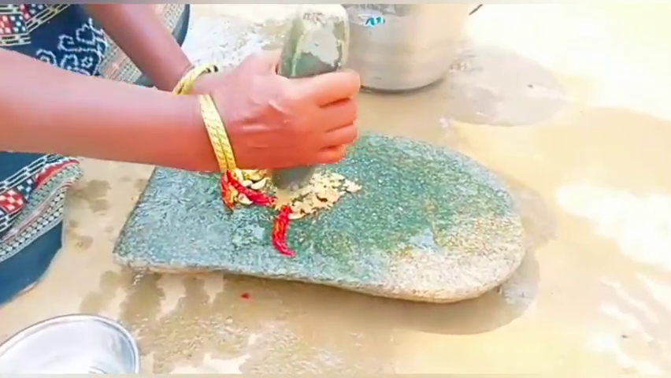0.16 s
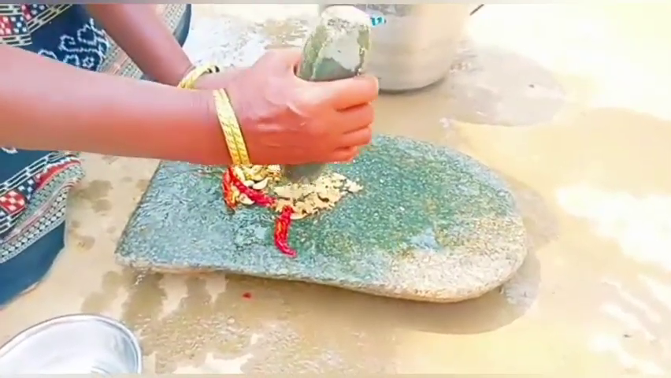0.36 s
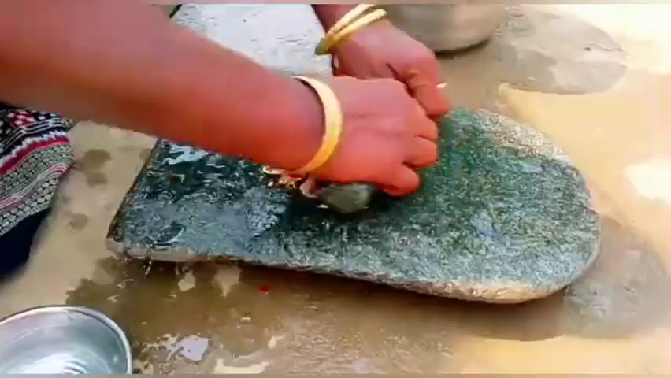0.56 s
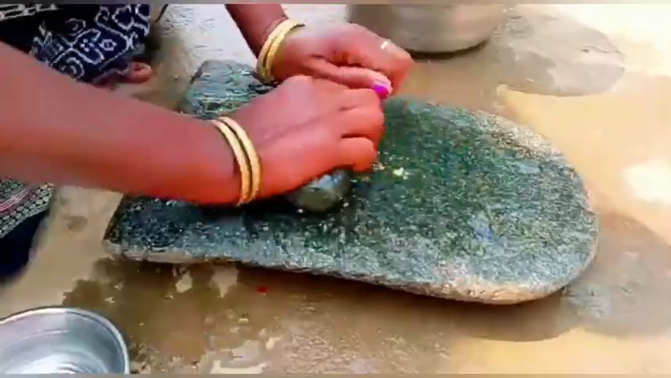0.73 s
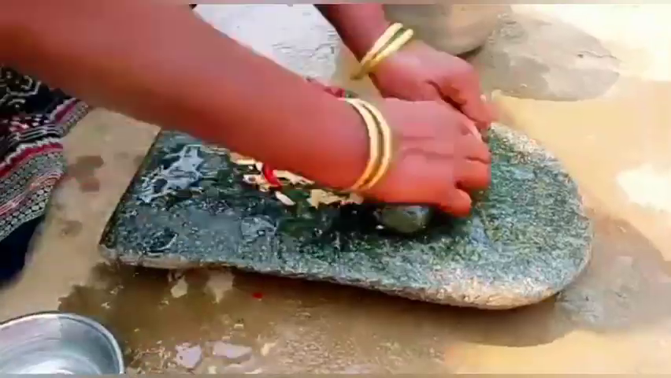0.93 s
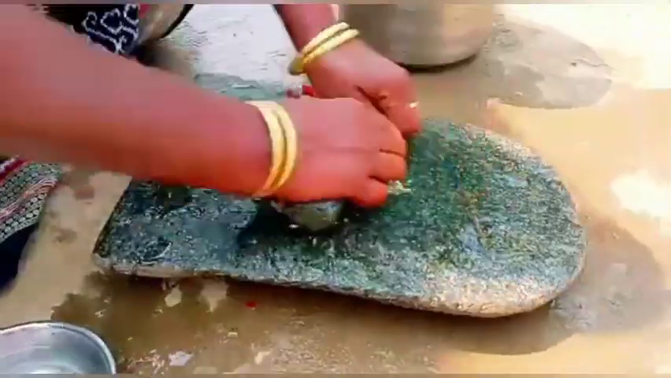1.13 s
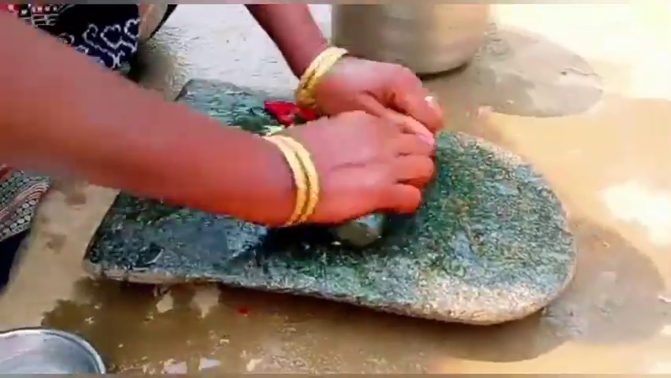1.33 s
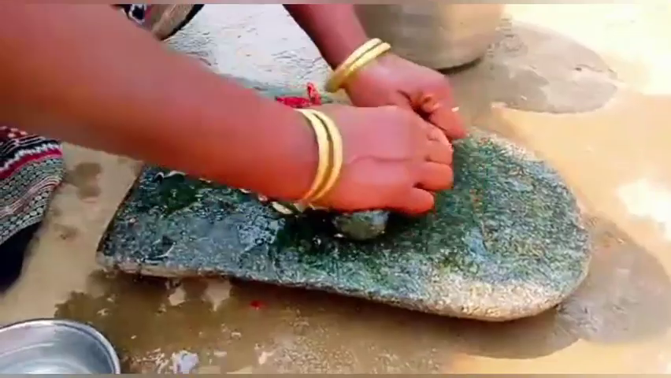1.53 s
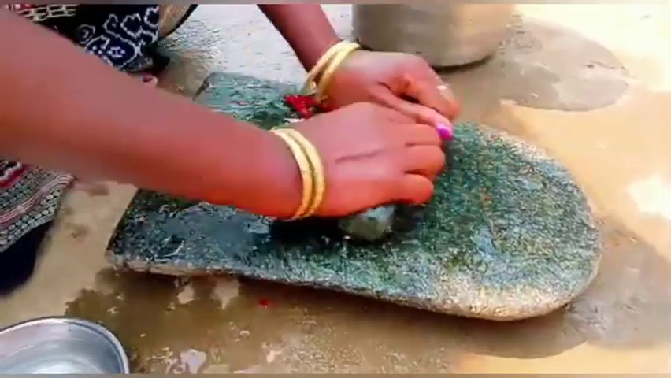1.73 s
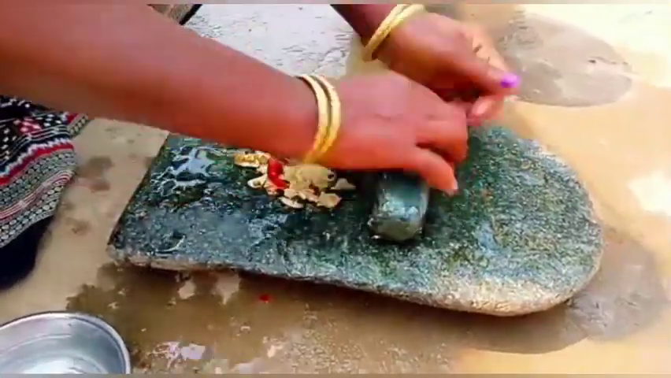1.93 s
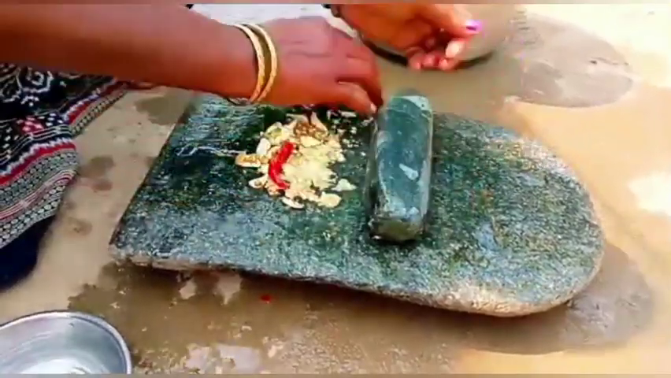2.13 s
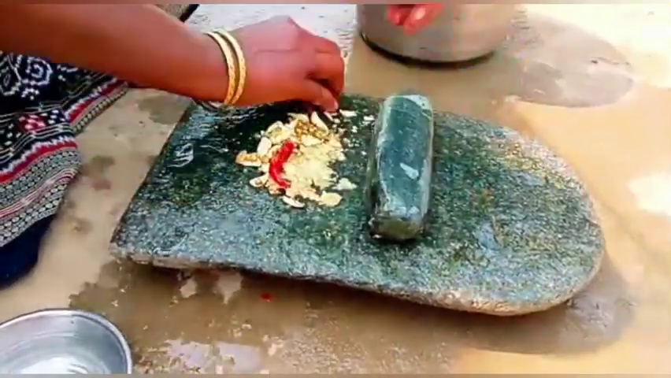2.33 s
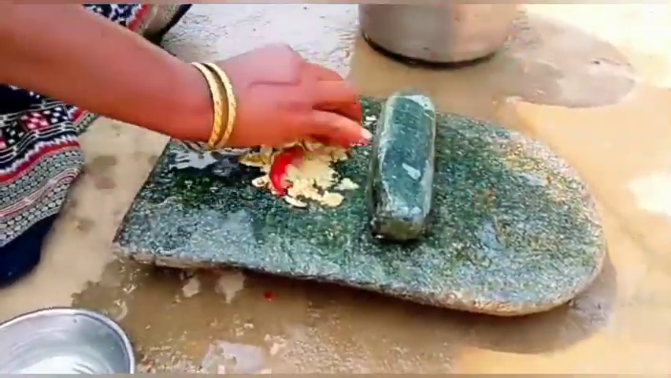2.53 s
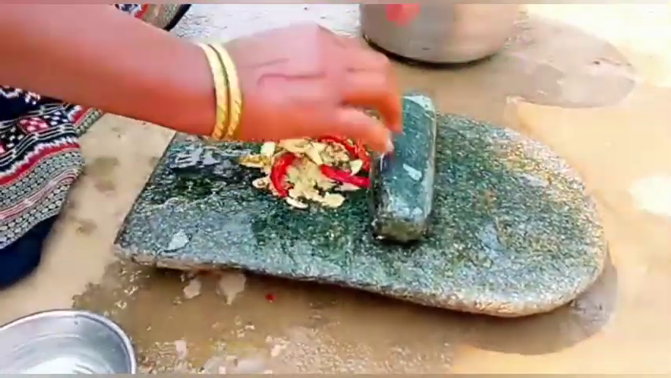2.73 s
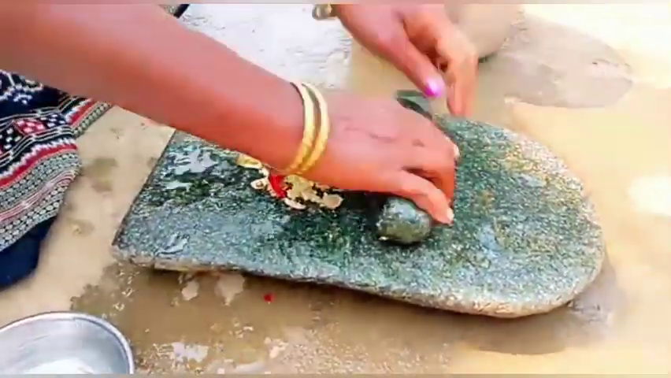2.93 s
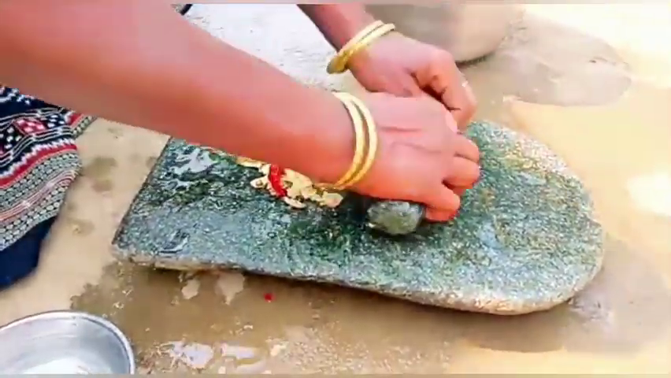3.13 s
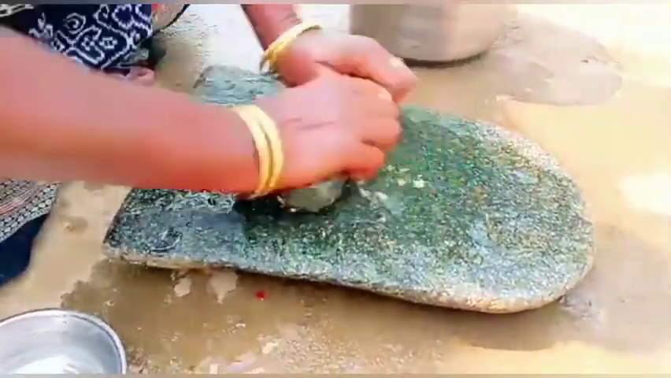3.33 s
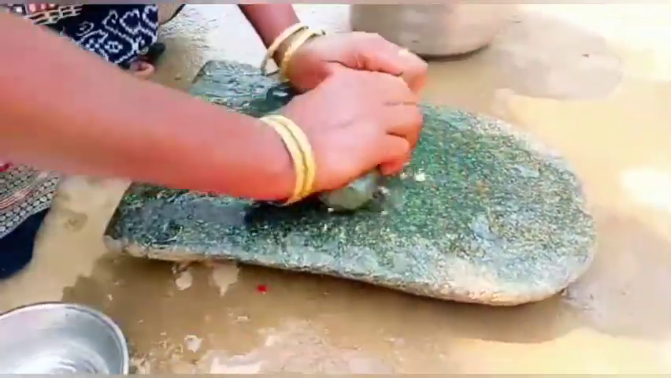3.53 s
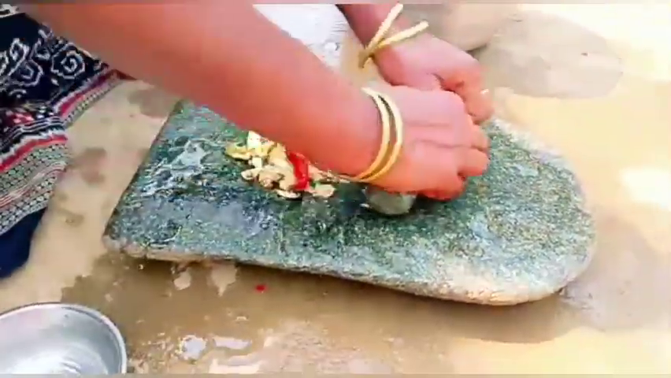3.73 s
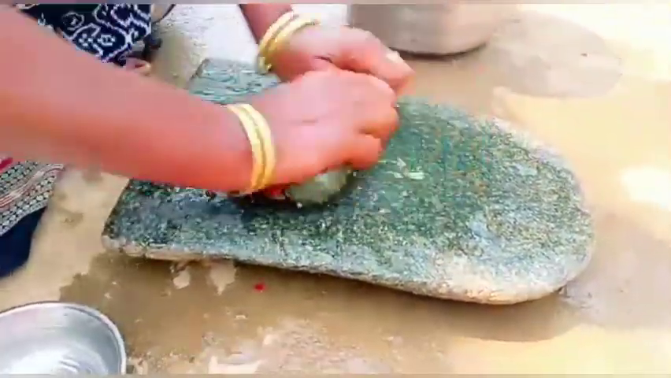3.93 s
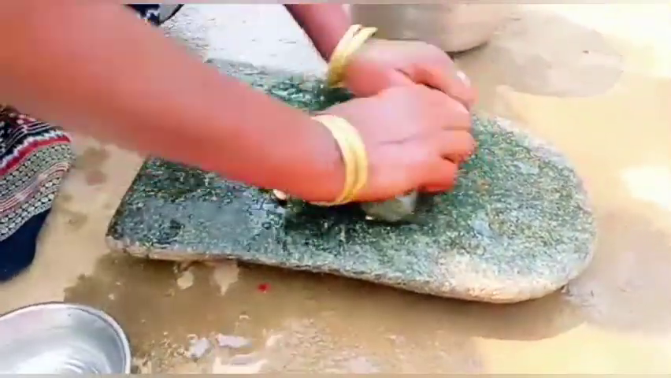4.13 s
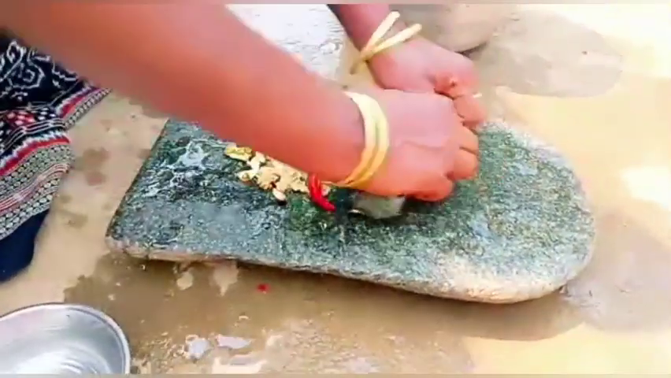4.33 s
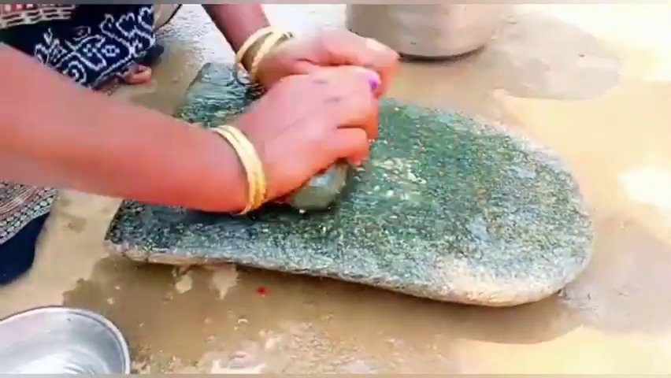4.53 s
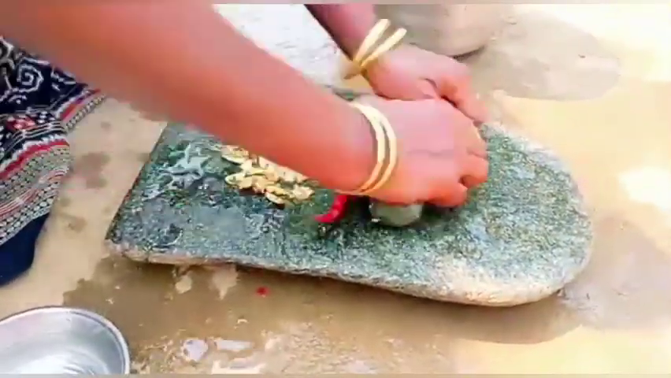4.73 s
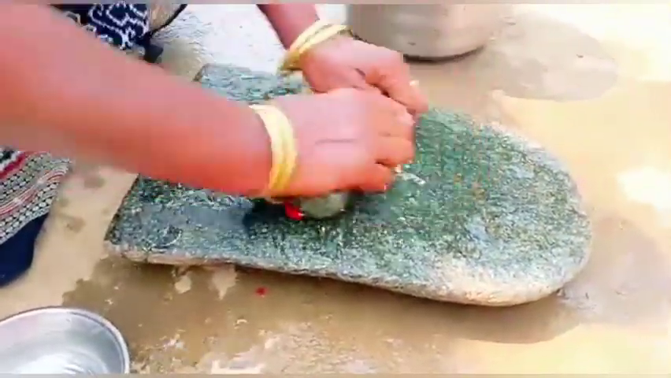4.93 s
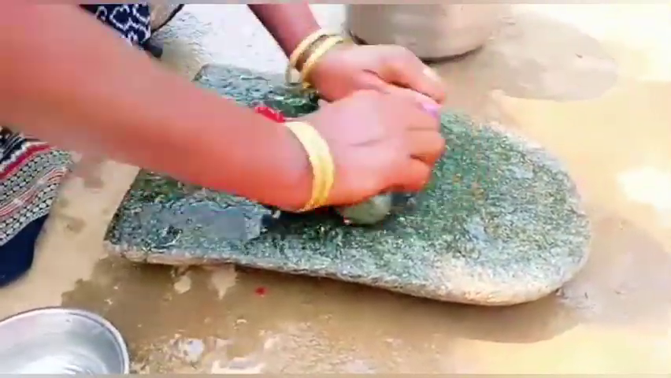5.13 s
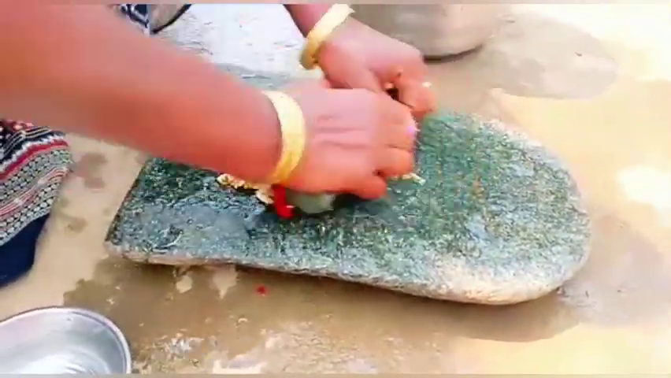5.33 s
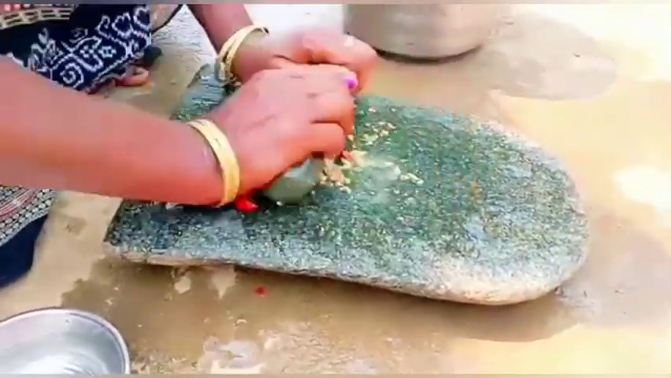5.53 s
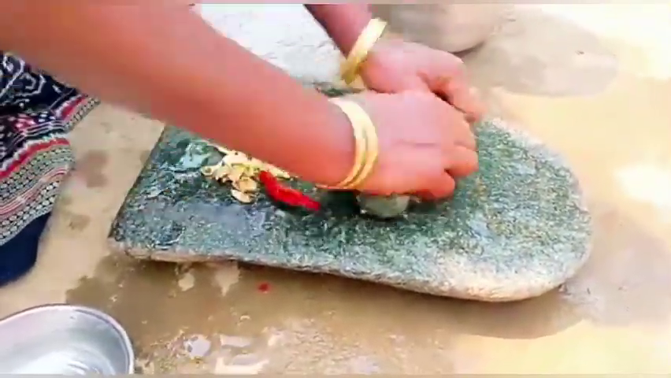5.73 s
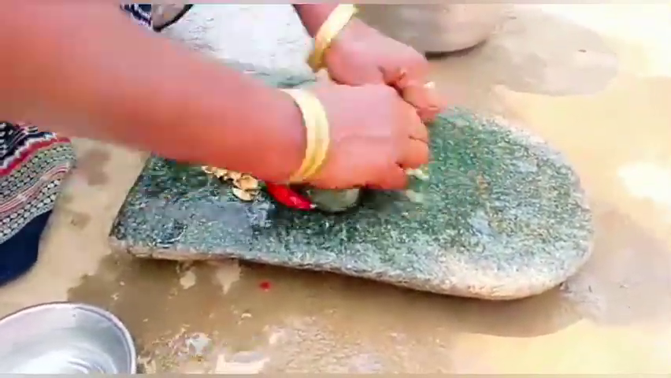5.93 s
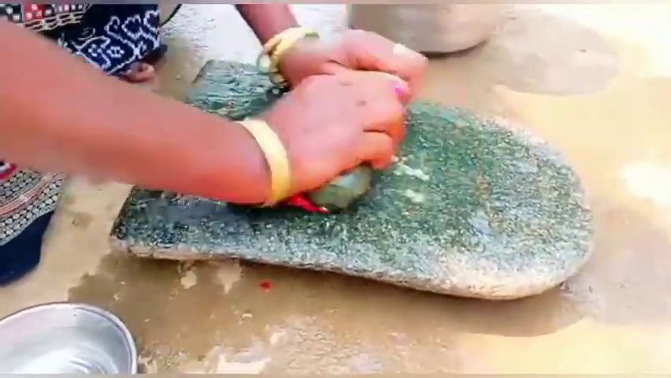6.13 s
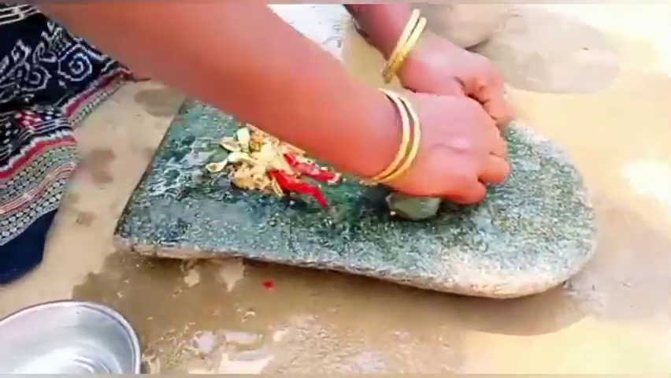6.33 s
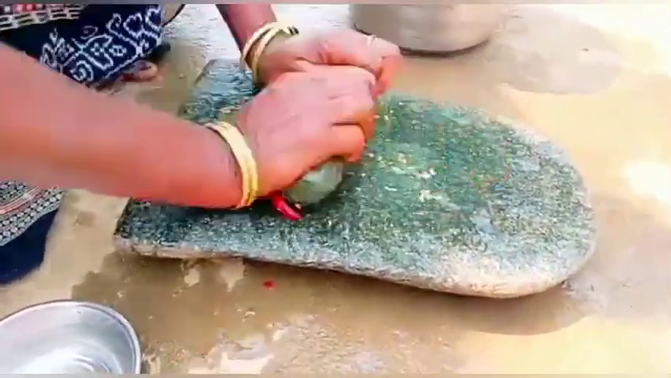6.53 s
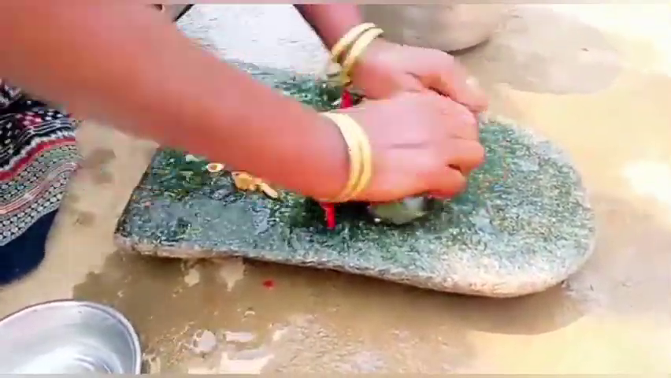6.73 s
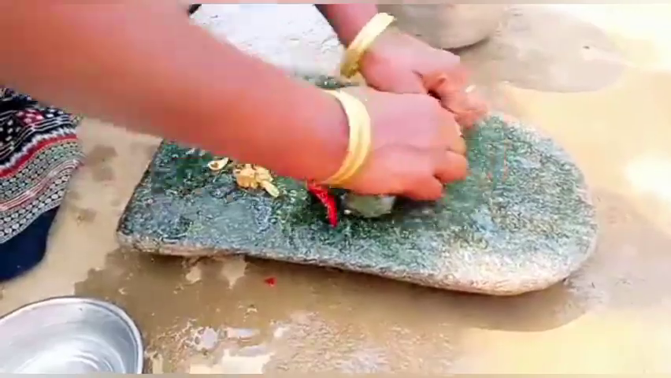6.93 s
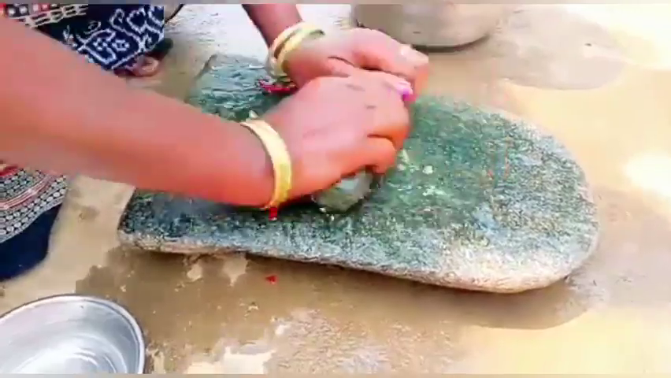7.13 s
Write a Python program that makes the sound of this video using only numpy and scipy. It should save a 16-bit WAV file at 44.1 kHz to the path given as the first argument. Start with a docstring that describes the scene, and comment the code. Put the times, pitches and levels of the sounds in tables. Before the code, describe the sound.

Close to the microphone in a quiet yard, dry chillies and garlic are ground on a flat stone. One thud opens, followed by gentle pushes and pulls and a faint rustle of fingers gathering the heap. Then the grinding resumes more firmly in a steady back-and-forth rhythm, with crisp crunching, gritty scraping, a low rumble and occasional stone clacks. Two bangles clink brightly as the strokes change direction.

```python
"""An open yard, a stereo microphone close to a stone slab: dried chillies and garlic are being ground.
The hand stone pounds once and the sound drops out briefly. A few light pushes and pulls follow, then
fingers rake the spices together. From about 3 s the strokes come harder: husks rasp and snap, stone
judders and knocks on stone, the slab rumbles. At the turns of the stroke two metal bangles slide
together on the wrist and clink."""
import sys
import numpy as np
from scipy import signal
from scipy.fft import rfft, irfft, next_fast_len
from scipy.io import wavfile
from scipy.ndimage import uniform_filter1d, map_coordinates

SR = 44100
rng = np.random.default_rng(int(sys.argv[2]) if len(sys.argv) > 2 else 0)


def store_pcm(level_fs):
    """Save levels as 16-bit WAV."""
    pcm = np.round(np.clip(level_fs, -1, 1) * 32767).astype(np.int16)
    wavfile.write(sys.argv[1], SR, np.atleast_2d(pcm).T)


N = 320597

# modes of the hand stone on the slab: (f/Hz, level/dB, t60/s)
STONE_MODES = [(700, -12, .012), (900, -9, .015), (1000, -12, .04), (1281, -22, .03), (1510, -8, .008),
               (1960, -4, .022), (2090, 2, .012), (2155, -5, .05), (2860, -11, .014), (3180, -17, .02),
               (5050, -18, .015), (5480, -19, .015)]
TOUCH_SPREAD_DB = 2.5   # how much a mode's strength varies from touch to touch


def from_db(db):
    """Decibels to gain."""
    return 10 ** (np.asarray(db) / 20)


def rms_one(x):
    """Scale to rms 1."""
    return x / np.sqrt(np.mean(x ** 2) + 1e-20)


def in_time(rows):
    """Each column of a (t/s, values...) curve at every sample."""
    s, *columns = np.transpose(rows)
    return [np.interp(np.arange(N) / SR, s, c) for c in columns]


def colour(x, spectrum):
    """Shape a sound by (f/Hz, level/dB) points."""
    hz, db = np.transpose(spectrum)
    size = next_fast_len(x.shape[-1] + 2048)
    bins = np.maximum(np.fft.rfftfreq(size, 1 / SR), 1)
    gain = from_db(np.interp(np.log(bins), np.log(hz), db))
    return irfft(rfft(x, size) * gain, size)[..., :x.shape[-1]]


def low_cut(x, hz, order):
    """Shed the bass below hz."""
    return signal.sosfilt(signal.butter(order, hz, "high", fs=SR, output="sos"), x)


def soften(x, hz):
    """A soft contact passes little above hz."""
    return signal.sosfilt(signal.butter(2, np.clip(hz, 20, .45 * SR), fs=SR, output="sos"), x)


def drift(hz):
    """A smooth random wander with spread 1."""
    r = np.exp(-40 * np.pi * hz / SR)
    slow = signal.lfilter([1], [1, -2 * r, r * r], rng.standard_normal(N // 20 + 2002))[2000:]
    return np.interp(np.arange(N) / 20, np.arange(len(slow)), rms_one(slow))


def ring(force, modes, spread_db=0):
    """A force rings (f/Hz, level/dB, t60/s) modes, each with a strength that depends on where it lands."""
    out = 0
    for k, (hz, db, t60) in enumerate(modes):
        r, w = from_db(-60 / (t60 * SR)), 2 * np.pi * hz / SR
        gain = (-1) ** k * from_db(db + spread_db * rng.standard_normal())
        out = out + gain * signal.lfilter([0, np.sin(w)], [1, -2 * r * np.cos(w), r * r], force + 1e-18)
    return out


def grains(per_s, size_db, count=N):
    """Random tiny fractures, a few much larger than the rest."""
    sizes = from_db(size_db * np.minimum(rng.exponential(1, count), 4))
    return (rng.random(count) < per_s / SR) * sizes * rng.choice([-1, 1], count)


def burst(decay_s, per_s, first):
    """Force of one contact: a first touch, then a dying chatter of smaller ones."""
    t = np.arange(SR // 3) / SR
    chatter = grains(per_s, 0.6, count=len(t)) * np.exp(-(t / decay_s) ** 2)
    return chatter / (np.linalg.norm(chatter) + 1e-9) + first * (t == 0)


def add(track, s, db, sound):
    """Place a sound at s with its loudest 3 ms at db."""
    loudest = np.sqrt(uniform_filter1d(sound ** 2, size=132).max()) + 1e-12
    start = round(s * SR)
    track[start:start + len(sound)] += (from_db(db) / loudest * sound)[:N - start]


def shifting(x, depth_db, hold_s, octaves):
    """The gap under the stone keeps changing shape, so its resonances come and go."""
    hz, s, parts = signal.stft(x, SR, nperseg=512)
    chance = rng.standard_normal((200, 1500))
    where = np.meshgrid(np.log2(1 + hz / 100) / octaves, s / hold_s, indexing="ij")
    gain = from_db(depth_db * map_coordinates(chance, where, order=1))
    return rms_one(signal.istft(parts * gain, SR)[1][..., :N])


def hiss(level_db=-69):
    """The background hiss rises a little in the pause between the runs of strokes."""
    spectrum = [(20, 11), (60, 14.5), (110, 2), (300, -2.5), (600, -10), (1300, -15), (2000, -5),
                (3500, -12.5), (5300, -15), (8000, -19), (16000, -21.5)]   # background hiss: (f/Hz, level/dB)
    swell = [(0, 1.5), (.7, -6), (1.9, 6), (2.9, 3.5), (3.6, 3), (7.2, 0.5)]   # its rise and fall: (t/s, level/dB)
    swell_db, = in_time(swell)
    noise = rng.standard_normal((2, N)) + rng.standard_normal(N)
    return from_db(level_db + swell_db) * rms_one(colour(noise, spectrum))


def yard(x, near_t60_s=.035, far_t60_s=.14, far_db=-10):
    """Nearby ground and pots scatter the sound from the sides; farther walls add a faint tail."""
    reflected = [(100, -20), (350, -13), (700, -10), (1500, -6), (5000, -5), (12000, -8)]   # reflections against the direct sound: (f/Hz, level/dB)
    t = np.arange(SR // 2) / SR
    near = rng.standard_normal(len(t)) * from_db(-60 * t / near_t60_s)
    far = rng.standard_normal((2, len(t))) * from_db(-60 * t / far_t60_s)
    scatter = near / np.linalg.norm(near) * [[1], [-1]] + from_db(far_db) * far / np.linalg.norm(far[0])
    scatter = np.pad(colour(scatter, reflected), ((0, 0), (SR // 1000, 0)))   # 1 ms late
    return x + signal.fftconvolve(x, scatter, axes=1)[:, :N]


def letting_go():
    """A faint ring as the hand slides off the stone."""
    modes = [(1160, -8, .04), (1260, -9, .04), (3210, -3, .07), (3400, -8, .04), (3750, -6, .03),
             (4930, 0, .04), (5230, -6, .04)]   # the lightly touched stone: (f/Hz, level/dB, t60/s)
    out = np.zeros(N)
    add(out, s=1.834, db=-49.5, sound=ring(burst(.06, 3000, first=.1), modes))
    return out


def rumble(level_db, gain_db=-1):
    """The stone rides over lumps and shakes the slab."""
    spectrum = [(25, -21), (50, -7.5), (80, 3.5), (130, 6.5), (240, 1.5), (300, -15.5), (390, -35),
                (500, -53), (900, -34.5)]   # the shaking slab: (f/Hz, level/dB)
    shake = colour(rng.standard_normal(N), spectrum)
    return shifting(shake, depth_db=4, hold_s=.093, octaves=.63) * from_db(level_db + gain_db)


def scrape(level_db, gain_db=-3.5):
    """The drag of the stone sounds hollow under the cupped hands."""
    spectrum = [(200, -4), (310, -13), (390, 5.5), (490, -16), (600, 7.5), (720, 2.5), (900, -0.5),
                (1300, -22.5), (2500, -86)]   # the hollow resonances: (f/Hz, level/dB)
    drag = colour(grains(3000, 2), spectrum)
    return shifting(drag, depth_db=4.5, hold_s=.05, octaves=.2) * from_db(level_db + gain_db)


def judder(level_db, slips_per_s=500, ring_db=-1, grit_db=-2):
    """Stone catches and slips on stone: the slips ring its modes over coarse grit."""
    spectrum = [(500, -2), (750, -9.5), (1000, 22.5), (1300, 0.5), (1800, 10.5), (2200, -13.5), (2700, -35),
                (4500, -48)]   # grit between the stones: (f/Hz, level/dB)
    slips = rms_one(ring(grains(slips_per_s, 0.91), STONE_MODES))
    grit = shifting(colour(grains(4000, 2.5), spectrum), depth_db=4.5, hold_s=.035, octaves=.2)
    return (from_db(ring_db) * slips + from_db(grit_db) * grit) * from_db(level_db + 3 * drift(35))


def thuds():
    """Blows cushioned by the spices rock the slab; each has its own bass cut, some deep, some thin."""
    blows = [(0.164, -25.5, 70.5, 247), (0.203, -43.5, 69.3, 182), (2.874, -37, 400, 273),
             (3.171, -45, 90, 350), (6.311, -47, 406, 730)]   # (t/s, level/dB, bass cut f/Hz, contact brightness f/Hz)
    slab_modes = [(84, -10, .13), (125, -2, .05), (185, 0, .04), (264, -6, .09), (360, -8, .06),
                  (570, -18, .05), (870, -6, .03), (1000, -2, .025)]   # the slab on the ground: (f/Hz, level/dB, t60/s)
    out = np.zeros(N)
    for s, db, low_hz, bright_hz in blows:
        force = soften(burst(.0015, 3500, first=1.9), bright_hz)
        add(out, s, db, ring(low_cut(force, low_hz, order=2), slab_modes))
    return out


def knocks(gain_db=-4):
    """The hand stone tips over a lump and lands on bare slab."""
    landings = [(0.166, -29.5, 556), (1.381, -38.5, 2270), (1.467, -30.5, 1750), (3.112, -36.5, 1000),
                (3.137, -41, 1210), (3.147, -31.5, 1220), (3.171, -28.5, 1390), (3.71, -34, 974),
                (3.743, -44, 2140), (4.08, -48, 3130), (5.295, -16, 2520), (5.336, -29.5, 1080),
                (5.412, -41.5, 824), (5.54, -29, 1990), (5.798, -39.5, 910), (5.826, -26.5, 1170),
                (5.849, -28.5, 912)]   # (t/s, relative level/dB, contact brightness f/Hz)
    out = np.zeros(N)
    for s, db, bright_hz in landings:
        force = soften(soften(burst(.004, 2500, first=2), 1.3 * bright_hz), 2600)
        clack = ring(force, STONE_MODES, TOUCH_SPREAD_DB / 2)
        add(out, s, db + gain_db, low_cut(clack, 600, order=4))   # a small stone radiates little bass
    return out


def bangles(high_db=-6, low_db=-18, tick_db=13, clack_db=3, skin_db_per_s=795):
    """Two bangles buzz together, clack and tinkle; their ring beams unevenly to left and right."""
    modes = [(2159, -19, .08), (3990, -19, .07), (4140, -20, .06), (6370, -10, .06), (6570, -10, .05),
             (9200, -17, .06), (9515, -12, .06), (9900, -8, .012), (10970, -16, .04), (11420, -10, .04),
             (12050, -6, .02), (12430, -3, .04), (12650, 2, .012), (12875, -3, .065), (13490, -18, .04),
             (15100, -12, .01)]   # both bangles, in close pairs: (f/Hz, level/dB, t60/s)
    clinks = [(1.175, -39.5, 0.012), (1.379, -42, 0.0093), (1.776, -37.5, .006), (2.119, -36, 0.0084),
              (2.162, -43, 0.011), (3.399, -22.5, 0.0027), (3.416, -33, 0.0055), (3.633, -35, 0.0049),
              (3.647, -24, 0.0033), (3.964, -26, 0.0069), (4.465, -23, 0.014), (4.711, -25.5, 0.02),
              (4.9714, -15, 0.0055), (5.192, -24.5, 0.021), (5.471, -32.5, 0.013), (5.49, -29, 0.043),
              (5.674, -30, 0.034), (5.993, -24.5, 0.022), (6.021, -16.5, 0.0031), (6.204, -29, 0.017),
              (6.234, -29.5, 0.024), (6.506, -21, 0.018), (6.526, -17, 0.0016), (6.736, -28.5, 0.039),
              (7.021, -21.5, 0.032), (7.2323, -29.5, 0.012)]   # they meet at the turns: (t/s, relative level/dB, buzz length/s)
    clacks = [(3.3981, -31), (3.967, -47.5), (4.426, -35), (4.463, -29.5), (4.472, -43), (4.9704, -34.5),
              (5.473, -40), (5.522, -44), (5.995, -36), (6.022, -39.5), (6.506, -31.5), (7.021, -31.5)]   # the wrist stops hard at the heap: (t/s, relative level/dB)
    tinkles = [(0.619, -56), (1.601, -44.5), (1.884, -51), (2.803, -41)]   # one bangle is grazed: (t/s, level/dB)
    grazed_mode = [(11530, 0, 0.031)]   # the one mode a graze sounds: (f/Hz, level/dB, t60/s)
    clack_modes = [(1450, -5, .012), (1900, -4, .014), (3300, -10, .006), (5400, 2, .006),
                   (5900, 0, .006), (7800, -1, .003), (10000, 3, .004)]
    out = np.zeros((2, N))
    for s, db, buzz_s in clinks:
        force = burst(buzz_s, 1100, first=0.11)
        tick = from_db(tick_db) * np.diff(force, prepend=0) / 2
        after_buzz_s = np.maximum(np.arange(len(force)) / SR - buzz_s, 0)
        skin = from_db(-skin_db_per_s * rng.random() * after_buzz_s)   # the wrist damps each differently
        for side in out:
            high = ring(force, [m for m in modes if m[0] > 8000], spread_db=3.5)
            low = ring(force, [m for m in modes if m[0] <= 8000], spread_db=3.5)
            add(side, s, db + high_db, skin * high + tick)
            add(side, s, db + low_db, skin * low)
    for s, db in clacks:
        stop = burst(0.027, 6700, first=1.03)
        for side in out:
            add(side, s, db + clack_db, ring(stop, clack_modes, TOUCH_SPREAD_DB))
    for s, db in tinkles:
        graze = ring(burst(.003, 2000, first=1), grazed_mode)
        for side in out:
            add(side, s, db, graze)
    return out


def snaps(gain_db=-5, crack_db=6):
    """A dry husk or seed breaks in a few quick cracks that ping the stone."""
    breaks = [(0.164, -28), (1.1653, -40), (1.2504, -25), (1.3009, -43), (2.236, -38.5), (2.2538, -36.5),
              (2.6242, -34.5), (2.804, -53), (3.261, -32.5), (3.3363, -32), (3.43, -30), (3.449, -23),
              (3.497, -31), (3.5975, -31), (3.8848, -34), (4.13, -35), (4.1739, -38), (3.9668, -33.5),
              (4.425, -28), (4.9732, -19.5), (5.07, -45), (5.5416, -24.5), (5.571, -48), (5.595, -25)]   # the loudest breaks: (t/s, relative level/dB)
    ping_modes = [(3300, -10, .006), (5200, -4, .01), (5800, -8, .007), (10500, -9, .003)]
    out = np.zeros(N)
    for s, db in breaks:
        force = burst(.002, 4000, first=1.5)
        crack = from_db(crack_db) * np.diff(force, prepend=0) / 2
        add(out, s, db + gain_db, ring(force, ping_modes, TOUCH_SPREAD_DB) + crack)
    return out


def rasp(level_db, fineness_db, flutter_db=2.5, coarse_db=2, fine_db=3.5, side_db=-6, split_hz=4300):
    """Husks crumble under the stone, coarse pieces sounding lower than fine."""
    spectrum = [(710, -40), (1200, -11), (1510, -10.5), (2060, -10.5), (2230, -9.5), (2530, -8),
                (3290, -2.5), (4600, -7), (5130, 4), (5650, -0.5), (7410, -17.5), (12100, -13),
                (15000, -21.5), (16000, -33.5)]   # crumbling husks: (f/Hz, level/dB)
    per_s = 12000 * from_db(.25 * (level_db - level_db.max()))   # a harder stroke breaks more
    fractures = (colour(grains(per_s, size_db=5) / np.sqrt(per_s), spectrum) for _ in range(2))
    mid, side = (shifting(x, depth_db=6.5, hold_s=.034, octaves=.14) for x in fractures)
    crumbs = mid + from_db(side_db) * side * [[1], [-1]]
    lows = colour(crumbs, [(split_hz / 1.15, 0), (split_hz, -6), (split_hz * 1.2, -40)])
    fine_share = 1 / (1 + from_db(-fineness_db) ** 2)
    coarse = lows * from_db(coarse_db) * np.sqrt(1 - fine_share)
    fine = (crumbs - lows) * from_db(fine_db) * np.sqrt(fine_share)
    return (coarse + fine) * from_db(level_db + flutter_db * drift(23.3))


def spices(crunch_db, fineness_db, microphone_lean_db=7):
    """Crumbling and snapping on the heap, heard left of the middle."""
    pan = [(0.7, 8.5), (0.82, 4.5), (1.88, 12.5), (1.97, 6), (2.33, 12), (3.32, 5), (3.4, 7.5), (6.44, 6),
           (7.2, 7)]   # the heap's place, microphone lean included: (t/s, left over right/dB)
    pan_db, = in_time(pan)
    sides = from_db(np.outer([.5, -.5], pan_db - microphone_lean_db))
    return (rasp(crunch_db, fineness_db) + snaps()) * sides


def moving(t, s, length, attack_s=.028, stop_db_per_s=612):
    """Gain of one movement: it starts quickly, holds and dies away."""
    onset = np.clip((t - s) / attack_s + .5, 0, 1) ** 2
    return onset * from_db(-stop_db_per_s * np.maximum(t - s - length, 0))


def passing(t, middle, hold_s, fall_db_per_s, rest_db):
    """Gain as the stone passes over a patch: full for a while, falling to rest_db on both sides."""
    away = np.maximum(np.abs(t - middle) - hold_s / 2, 0)
    return from_db(np.maximum(-fall_db_per_s * away, rest_db))


def handwork(grip_s=.76):
    """Strokes, rakes and rocking add up to crunch, fineness, judder, scrape and rumble, in dB."""
    # The heap lies at the near end: a push mostly crunches, then meets bare stone; a pull the reverse.
    # Both: (t/s, length/s, crunch/dB, its place in the stroke 0-1, fine over coarse/dB,
    # place of bare contact 0-1, judder/dB, scrape/dB, rumble/dB)
    pushes = [(.745, 0.17, -48, .35, -0.5, 0.83, -60.5, -55.5, -48),
              (1.205, 0.18, -42.5, 0.32, 0, 0.89, -56, -64, -49.5),
              (1.64, 0.14, -52.5, 0.16, 7, 1, -66.5, -82, -48.5),
              (3.40, 0.2, -40.5, 0.52, -2, 1, -50.5, -87, -47),
              (3.965, 0.19, -38, 0.49, -5.5, 0.52, -51.5, -39.5, -50.5),
              (4.48, 0.21, -44, 0.44, -1, 0.65, -58.5, -49, -51),
              (4.98, 0.16, -47, 0.59, 4, 0.92, -59, -77.5, -53),
              (5.49, 0.16, -38, 0.54, -3, 0.59, -56, -64, -51),
              (6.01, 0.23, -41.5, 0.45, 1, 0.28, -63.5, -59, -48.5),
              (6.51, 0.21, -44, 0.47, 0, 0.8, -54.5, -59, -48),
              (7.03, 0.18, -46, 0.44, 3.5, 0.63, -62.5, -67, -53)]
    pulls = [(1.0, 0.14, -49, 0.87, 3, 0.39, -57, -51, -47),
             (1.475, .11, -51.5, 0.81, 5.5, 0.08, -56.5, -57.5, -47.5),
             (3.095, 0.2, -53, 0.9, -1, 0.31, -50, -55.5, -48.5),
             (3.72, 0.19, -45, 0.7, -4.5, 0.34, -48.5, -61.5, -49),
             (4.275, 0.13, -41.5, 0.79, -8, 0.36, -58, -56, -48),
             (4.79, 0.17, -44.5, 0.52, -4, 0.42, -58.5, -58, -50),
             (5.29, 0.26, -52, 0.13, 4, 0.22, -54, -59.5, -50),
             (5.826, 0.15, -38.5, 0.03, -2.5, 0.1, -49.5, -52, -48.5),
             (6.315, 0.38, -43, 0.32, -4, 0.21, -49, -48.5, -47.5),
             (6.85, 0.22, -46.5, 0.48, -2.5, 0.32, -53.5, -49, -49)]
    # fingers rake the spices together: (t/s, length/s, rustle/dB, scrape/dB)
    rakes = [(0.649, 0.022, -67, -117), (1.838, 1.05, -71, -84), (2.02, 0.1, -60, -62.5),
             (2.148, 0.076, -83, -75), (2.21, .085, -58, -63.5), (2.388, 0.16, -65, -66.5),
             (2.48, 0.033, -48.5, -59), (2.55, 0.1, -66, -86), (2.63, .04, -57.5, -65),
             (2.671, 0.062, -60, -59), (2.788, 0.043, -66, -59)]
    # the stone rocks at a turn or under a new grip: (t/s, length/s, judder/dB, scrape/dB, rumble/dB)
    rocks = [(1.818, 0.088, -82, -87, -56), (2.85, 0.22, -103, -87, -61.5), (3.056, 0.12, -55, -63.5, -60),
             (3.187, 0.057, -85, -68, -41.5), (3.627, 0.044, -66, -74, -55),
             (4.142, 0.027, -52.5, -51.5, -45.5), (4.702, 0.074, -66, -56, -57.5),
             (5.16, 0.012, -54, -46.5, -47.5), (5.231, 0.045, -58.5, -53.5, -54),
             (5.691, 0.027, -68, -87, -48), (5.795, 0.021, -48.5, -70, -43.5),
             (6.186, 0.021, -57, -62, -48.5), (6.75, 0.1, -67.5, -59, -56), (7.207, 0.043, -68, -73, -49.5)]
    t = np.arange(0, N, 32) / SR
    # a move is (fineness/dB, gains of [crunch, judder, scrape, rumble]); first, the held stone stirs
    moves = [(0.025, [from_db(db) * (t > grip_s) + 1e-6 for db in (-72.5, -78.5, -90.5, -79.5)])]
    for strokes, crunch_s, contact_s in ((pushes, .074, .047), (pulls, .072, .071)):
        for s, length, crunch_db, heap_at, fine_db, bare_at, judder_db, scrape_db, rumble_db in strokes:
            heap_s, bare_s = s + heap_at * length, s + bare_at * length
            heap = passing(t, heap_s, crunch_s, fall_db_per_s=276, rest_db=-12)
            bare = passing(t, bare_s, contact_s, fall_db_per_s=396, rest_db=-24.5)
            hollow = passing(t, bare_s, contact_s, fall_db_per_s=615, rest_db=-22)   # stone lying flat
            shake = passing(t, bare_s, contact_s, fall_db_per_s=298, rest_db=-11.5)
            peaks = from_db([crunch_db, judder_db, scrape_db, rumble_db])[:, None]
            moves.append((fine_db, peaks * [heap, bare, hollow, shake] * moving(t, s, length)))
    for s, length, rustle_db, scrape_db in rakes:
        peaks = [from_db(rustle_db), 0, from_db(scrape_db), from_db(rustle_db - 18)]
        moves.append((-3.5, np.outer(peaks, moving(t, s, length))))
    for s, length, *stone_db in rocks:
        moves.append((0, np.outer([0, *from_db(stone_db)], moving(t, s, length))))
    power = np.array([gains for _, gains in moves]) ** 2
    fineness = np.array([db for db, _ in moves]) @ power[:, 0] / power[:, 0].sum(axis=0)
    crunch, *stone = 10 * np.log10(power.sum(axis=0))
    return in_time(np.transpose([t, crunch, fineness, *stone]))


def microphone_ports(left, right):
    """Two microphone ports: the treble is louder on the left and arrives there a little later."""
    lead = [(60, 0), (1000, -.25), (2000, -.5), (5500, -1.1), (9500, -1), (13000, -.8)]   # phase lead of the left port: (f/Hz, phase/rad)
    lean = [(100, 0), (350, -.5), (700, .8), (1400, 2), (2800, 1.3), (5600, 3.7), (11000, 4.8),
            (15000, 5.5)]   # left port over right: (f/Hz, level/dB)
    size = next_fast_len(N + 2048)
    phase = np.interp(np.fft.rfftfreq(size, 1 / SR), *np.transpose(lead))
    left = irfft(rfft(left, size) * np.exp(1j * phase), size)[:N]
    return np.array([colour(left, [(hz, db / 2) for hz, db in lean]),
                     colour(right, [(hz, -db / 2) for hz, db in lean])])


def scene():
    """All the work happens close to the microphone, over a quiet background hiss."""
    crunch_db, fineness_db, judder_db, scrape_db, rumble_db = handwork()
    stone = judder(judder_db) + scrape(scrape_db) + rumble(rumble_db) + knocks() + thuds() + letting_go()
    work = spices(crunch_db, fineness_db) + stone + bangles()
    return microphone_ports(*yard(work)) + hiss()


def record(dry, low_cut_hz=62, top_hz=16900, dropout_s=(0.467, 0.552)):
    """The microphone sheds the deep bass; the sound drops out after the first blow; the top is cut."""
    t = np.arange(N) / SR
    thin = low_cut(dry, low_cut_hz, order=3)
    heard = uniform_filter1d(1. * ((t < dropout_s[0]) | (t > dropout_s[1])), size=128)
    return signal.sosfilt(signal.cheby2(12, 60, top_hz, fs=SR, output="sos"), thin * heard)


dry = scene()
out = record(dry)
store_pcm(out)
```